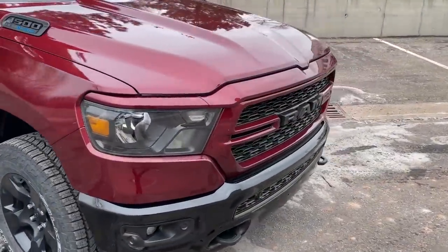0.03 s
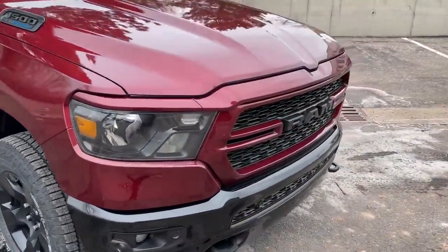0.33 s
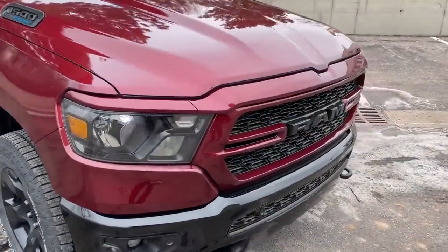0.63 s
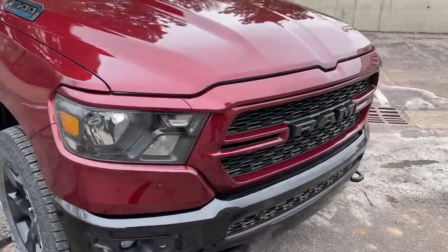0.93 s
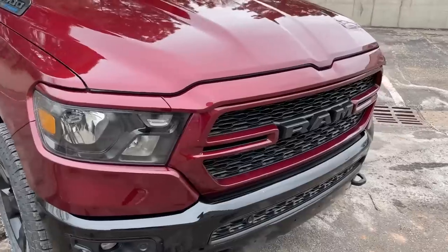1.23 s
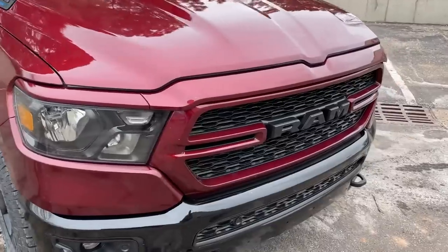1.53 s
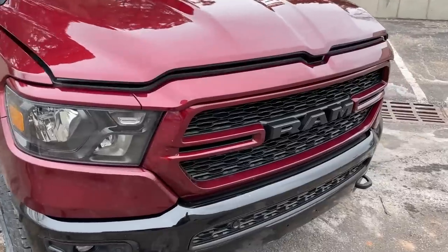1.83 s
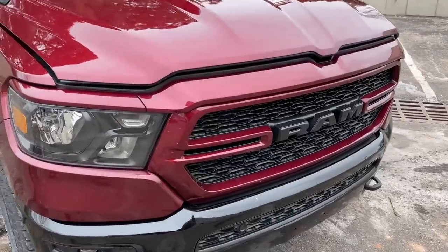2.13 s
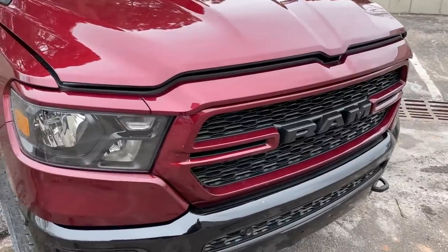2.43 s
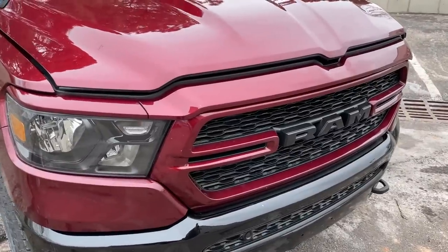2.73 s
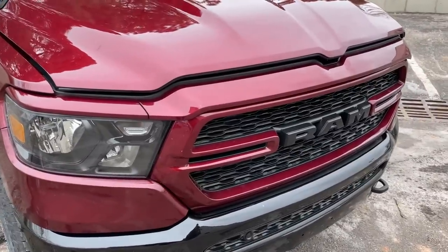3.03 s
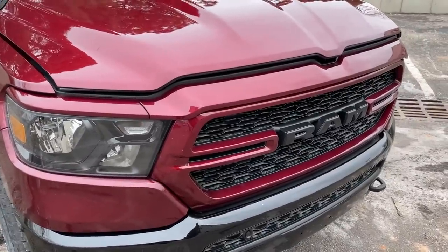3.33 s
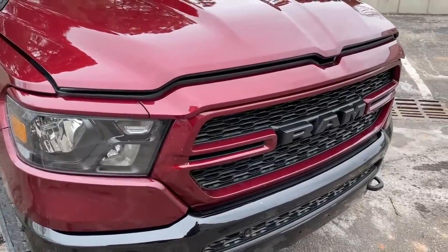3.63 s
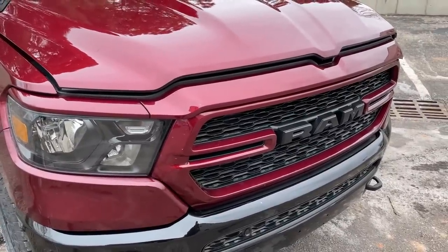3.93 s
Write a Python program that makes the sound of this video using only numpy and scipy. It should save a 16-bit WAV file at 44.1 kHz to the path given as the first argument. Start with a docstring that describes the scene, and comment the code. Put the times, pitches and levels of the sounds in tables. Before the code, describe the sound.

Pickup hood popping up with a shudder, followed by a latch clack and heavy door slam.

```python
"""Pickup hood pop and door slam

In a quiet paved yard, a pickup's hood pops up on its spring and shudders against the catch.
The door latch clacks open, shoes scuff and tick on grit, and the door slams with a heavy clunk.
Hood, latch and door are each a cluster of blows ringing a metal body.
Soft low bumps and handling rustle sit over a bed of distant rumble."""
import sys
import numpy as np
from scipy import signal
from scipy.fft import rfft, irfft
from scipy.io import wavfile
from scipy.ndimage import uniform_filter1d

SR = 44100
rng = np.random.default_rng(int(sys.argv[2]) if len(sys.argv) > 2 else 0)


def pcm_store(signal):
    """Save signal as 16-bit PCM."""
    levels = np.round(np.clip(np.atleast_2d(signal), -1, 1) * 32767)
    wavfile.write(sys.argv[1], SR, levels.astype(np.int16).T)


N = 176400

# EQ of the distant rumble and of the faint hiss: f/Hz, gain/dB
RUMBLE_EQ = [(20, -5), (55, 0), (240, -17), (650, -21.5), (1400, -31.5), (3000, -54)]
HISS_EQ = [(900, 7), (1600, -7.5), (5000, -4), (15500, -16)]
# low bumps of handling and of the cab rocking: t/s, level/dB, f/Hz, fade/s
BUMP_CUES = [(.002, -31.5, 129, 0.018), (0.028, -46.5, 44.4, 0.84), (1.001, -29.5, 62.5, 0.015),
             (2.646, -40.5, 43.8, 0.22), (2.668, -37.5, 86.7, 0.053), (2.744, -31.5, 106, 0.017),
             (2.958, -44, 112, 0.031)]
# shoe scuffs and cloth rustle: centre t/s, half width/s, level/dB, tilt/(dB per octave)
SCUFF_CUES = [(0.054, 0.2, -68.5, -2.5), (0.617, 0.29, -71.5, -3), (1.006, 0.03, -63, -2),
              (1.065, 0.028, -56.5, 0.5), (1.274, 0.04, -67.5, 0), (1.49, 0.14, -72.5, -2),
              (3.06, 0.28, -70, -6), (3.878, 0.047, -61.5, -7.5), (3.985, 0.15, -66, -4.5)]
# grit underfoot and handling clicks: t/s, level/dB, tilt/(dB per octave), ring f/Hz, fade/s
TICK_CUES = [(.07, -65, 4, 1970, 0.0053), (.669, -52.5, -5, 2390, 0.0053), (0.684, -59, -5.5, 1760, 0.012),
             (.711, -62, -6, 2500, 0.0036), (0.942, -55, -4.5, 1274, 0.007),
             (0.985, -61, -4.5, 1500, 0.005), (1.248, -55, -6, 540, 0.0069),
             (1.407, -65.5, -0.5, 3070, 0.013), (1.5136, -54.5, -3, 2580, .004),
             (1.5333, -54.5, -3, 2320, 0.0063), (2.795, -63.5, -5, 1660, 0.0052),
             (2.853, -58, -6, 1580, 0.008), (2.8813, -37, 0.5, 14700, 0.00096),
             (2.9377, -63.5, -9, 1580, 0.0054), (3.103, -73.5, -11.5, 560, 0.0096),
             (3.154, -47.5, 1.5, 1800, 0.00097), (3.458, -60, 0.5, 1580, 0.0044),
             (3.7239, -53, -5.5, 1600, 0.003), (3.7514, -59, -0.5, 1580, 0.015)]
# EQ shared by scuffs and ticks: f/Hz, gain/dB
GRIT_EQ = [(100, 6), (550, 8), (4400, 3), (6000, 0), (7500, 0), (10000, 0), (15000, -23)]

# blows on each body: t/s, bass level/dB, mid level/dB, treble level/dB
LATCH_HITS = [(2.092, -44, -45.5, -59), (2.1037, -35, -23.5, -30), (2.1072, -30, -32.5, -51)]  # the pawl
HOOD_HITS = [(1.657, -31.5, -39.5, -25.5), (1.679, -36, -36.5, -31), (1.7245, -29, -30, -23.5),
             (1.757, -36, -40, -24), (1.837, -38.5, -34.5, -33.5), (1.872, -42.5, -38.5, -50),
             (1.938, -45, -39.5, -47)]  # hood springing against its catch
DOOR_HITS = [(3.8695, -32, -17.5, -21), (3.8835, -14.5, -12, -4), (3.911, -29.5, -27, -13),
             (3.933, -19.5, -38, -46)]  # door meeting seal, striker and frame
# clear resonances of each body: f/Hz, relative level/dB
LATCH_RINGS = [(172, -3.5), (545, -5.5), (1270, 4), (2000, -3), (2270, 2.5), (2437, 4)]
HOOD_RINGS = [(60, -3), (99, -8), (155, -1.5), (201, 2.5), (356, 1), (488, -4), (597, -9), (690, -13),
              (850, -8)]  # hood panel
DOOR_RINGS = [(47, 11), (88, -8), (160, 1), (201, 2.5), (387, 5), (489, -0.5), (537, -5.5), (635, -4.5),
              (766, -10.5), (1058, -12.5), (1320, -9)]  # door skin and cab
# EQ of each body's dense wash of modes: f/Hz, gain/dB
LATCH_EQ = [(100, 4), (300, -5), (1250, -4.5), (1700, -22.5), (2300, -4), (4700, -7), (10000, -6.5),
            (14500, -27.5)]
HOOD_EQ = [(25, 6), (110, 4), (260, -6), (800, -11), (1150, -23), (1700, -29.5), (4000, -46.5), (9500, -49),
           (15000, -71)]
DOOR_EQ = [(25, 6.5), (110, -1.5), (190, -0.5), (290, -7), (520, -1), (1000, -14), (2600, -39), (8500, -51),
           (15000, -59.5)]
# time each body's tail takes to fall 60 dB: f/Hz, T60/s
LATCH_T60 = [(200, 0.65), (1500, 0.16), (8000, 0.081)]
HOOD_T60 = [(100, 0.82), (800, 0.51), (2400, 0.46), (7000, 0.12)]
DOOR_T60 = [(60, 0.73), (400, 0.37), (3500, 0.17)]


def amp(db):
    """Decibels to gain."""
    return 10 ** (np.asarray(db) / 20)


def curve_at(points, hz):
    """Reads a curve along log frequency."""
    f, value = np.transpose(points)
    return np.interp(np.log(hz + 1), np.log(f + 1), value)


def unit_rms(x):
    """Scales to rms 1."""
    return x / np.sqrt(np.mean(x ** 2) + 1e-20)


def place(mix, start_s, sound):
    """Drops a sound into the mix at its cue."""
    part = mix[max(round(start_s * SR), 0):][:len(sound)]
    part += sound[:len(part)]


def bins(x):
    """Frequencies of a signal's spectrum."""
    return np.fft.rfftfreq(len(x), 1 / SR)


def eq(x, points):
    """Filters by a curve of f/Hz, gain/dB."""
    return irfft(rfft(x) * amp(curve_at(points, bins(x))), len(x))


def yard(rumble_db=-56, swell_db=1.5, hiss_db=-78):
    """The bed: distant rumble that swells a little, and faint hiss."""
    swell = unit_rms(uniform_filter1d(uniform_filter1d(rng.standard_normal(N), size=5000), size=3000))
    rumble = unit_rms(eq(rng.standard_normal(N), RUMBLE_EQ)) * amp(rumble_db + swell_db * swell)
    hiss = unit_rms(eq(rng.standard_normal(N), HISS_EQ)) * amp(hiss_db)
    return rumble + hiss


def bumps(rise_s=0.0013):
    """Handling and the rocking cab give soft thuds, each one damped low tone."""
    out, t = np.zeros(N), np.arange(SR) / SR
    for start_s, db, hz, fade_s in BUMP_CUES:
        envelope = (1 - np.exp(-t / rise_s)) * np.exp(-t / fade_s)
        place(out, start_s, amp(db) * envelope * np.sin(2 * np.pi * hz * t))
    return out


def grit_tone(x, db, tilt_db, pivot_hz=2820):
    """Gives a tick or scuff its level and brightness."""
    octaves = np.log2(np.maximum(bins(x), 700) / pivot_hz)
    return irfft(rfft(eq(x, GRIT_EQ)) * amp(db + tilt_db * octaves), len(x))


def uneven_friction(x, flicker_db=3.3, size=512):
    """Friction catches unevenly: broad bands of the hiss flicker from moment to moment."""
    frames = signal.stft(x, nperseg=size)[2]
    patches = uniform_filter1d(rng.standard_normal(frames.shape), size=70, axis=0)
    flicker = unit_rms(uniform_filter1d(patches, size=3, axis=1))
    return signal.istft(frames * amp(flicker_db * flicker), nperseg=size)[1][:N]


def scuffs(grains_per_s=3500, spread_db=2):
    """Shoes and cloth rub in swells of tiny friction grains."""
    out, t = np.zeros(N), np.arange(N) / SR
    for centre_s, half_s, db, tilt_db in SCUFF_CUES:
        grains = rng.standard_normal(N) * (rng.random(N) < grains_per_s / SR)
        accents = amp(spread_db * np.minimum(rng.exponential(1, N), 4))
        offset = (t - centre_s) / half_s
        swell = np.exp(-offset ** 2 / 2 - offset ** 4 / 10)
        out += grit_tone(unit_rms(grains * accents), db, tilt_db) * swell
    return uneven_friction(out)


def ticks(ring_db=8.5, ring_octaves=0.61, size=4096):
    """Grit and handling give small dry cracks, each with one broad ring and a faint tail."""
    out, t = np.zeros(N), np.arange(size) / SR
    for start_s, db, tilt_db, ring_hz, fade_s in TICK_CUES:
        ring = amp(ring_db * np.exp(-(np.log2((bins(t) + 1) / ring_hz) / ring_octaves) ** 2))
        crack = irfft(rfft(grit_tone(rng.standard_normal(size), db, tilt_db)) * ring)
        envelope = np.exp(-t / fade_s) + amp(-25) * np.exp(-t / 0.014)
        place(out, start_s, crack * envelope)
    return out


def onset(t, hz, attack_s):
    """A blow's rise (attack_s at 1 kHz, slower in the bass) and the time since its peak."""
    rise_s = attack_s * (1000 / hz) ** 0.37
    return np.minimum(t / rise_s, 1), np.maximum(t - rise_s, 0)


def dense_ring(t, colour, t60, tone, attack_s, crack_s, tail_db, bands=16):
    """Countless close modes blur into noise: a short crack, then a tail that dies band by band."""
    hz, noise = bins(t), rng.standard_normal(len(t))
    spectrum = rfft(unit_rms(eq(noise, colour))) * amp(curve_at(tone, hz))
    centres = np.geomspace(50, 14000, bands)
    out = np.zeros(len(t))
    for centre, solo in zip(centres, np.eye(bands)):
        band = irfft(spectrum * curve_at(list(zip(centres, solo)), hz))
        rise, age = onset(t, centre, attack_s)
        crack = np.exp(-age / crack_s * (centre / centres[bands // 2]) ** 0.2)  # tighter up top
        tail = amp(tail_db - 60 * age / curve_at(t60, centre))
        out += band * rise * np.hypot(crack, tail)
    return out


def struck(hits, rings, colour, t60, tone_hz, ring_db, ring_share, attack_s, crack_s, tail_db):
    """Each blow rings the same body: a dense wash, and clear modes that last ring_share of its T60."""
    out, t = np.zeros(N), np.arange(32768) / SR
    for start_s, *levels in hits:
        tone = list(zip(tone_hz, levels))  # this blow's bass, mid and treble
        place(out, start_s, dense_ring(t, colour, t60, tone, attack_s, crack_s, tail_db))
        for hz, db in rings:
            rise, age = onset(t, hz, attack_s)
            fall = amp(-60 * age / (ring_share * curve_at(t60, hz)))
            gain = amp(ring_db + db + curve_at(tone, hz))
            place(out, start_s, -gain * rise * fall * np.sin(2 * np.pi * hz * t))
    return out


def latch():
    """The steel door latch snaps open with a bright clack."""
    return struck(LATCH_HITS, LATCH_RINGS, LATCH_EQ, LATCH_T60, tone_hz=(200, 1500, 8000),
                  ring_db=-9, ring_share=0.3, attack_s=0.0018, crack_s=0.0091, tail_db=-14)


def hood():
    """The released hood jumps, hits the safety catch and shudders."""
    return struck(HOOD_HITS, HOOD_RINGS, HOOD_EQ, HOOD_T60, tone_hz=(150, 600, 5000),
                  ring_db=-16.5, ring_share=0.92, attack_s=0.005, crack_s=0.017, tail_db=-7)


def door(puff_at_s=3.886, puff_width_s=0.0029, puff_db=-18.5):
    """The door shuts with a heavy clunk and pushes out a puff of air."""
    offset = (np.arange(N) / SR - puff_at_s) / puff_width_s
    puff = -amp(puff_db) * (np.exp(-offset ** 2) - np.exp(-(offset / 2 - 1) ** 2) / 2)
    clunk = struck(DOOR_HITS, DOOR_RINGS, DOOR_EQ, DOOR_T60, tone_hz=(170, 800, 5000),
                   ring_db=-15, ring_share=0.48, attack_s=0.00262, crack_s=0.0068, tail_db=-14.5)
    return puff + clunk


def scene():
    """The truck and the small sounds around it, in open air, mixed to mono."""
    return (hood() + latch() + door() + ticks() + scuffs() + bumps() + yard())[None]


def record(dry, cutoff_hz=15900):
    """A steep high cut on the whole mix."""
    high_cut = signal.firwin(401, cutoff_hz, window=("kaiser", 8), fs=SR)
    return signal.oaconvolve(dry, high_cut[None], "same")


dry = scene()
out = record(dry)
pcm_store(out)
```